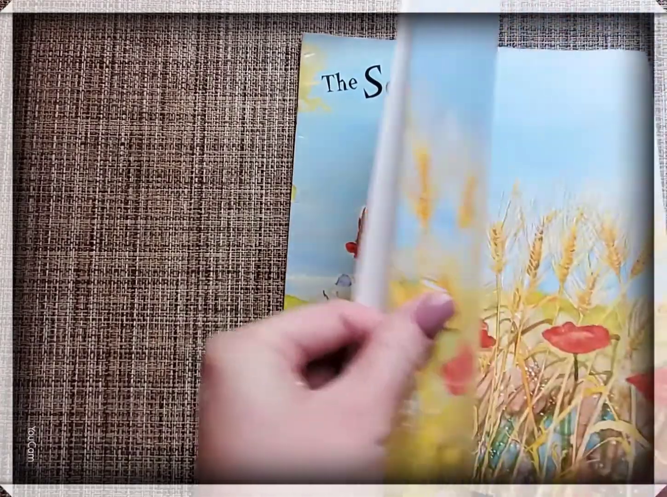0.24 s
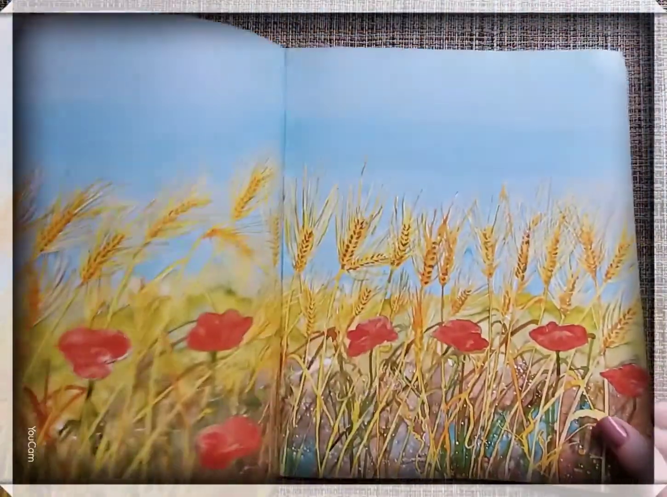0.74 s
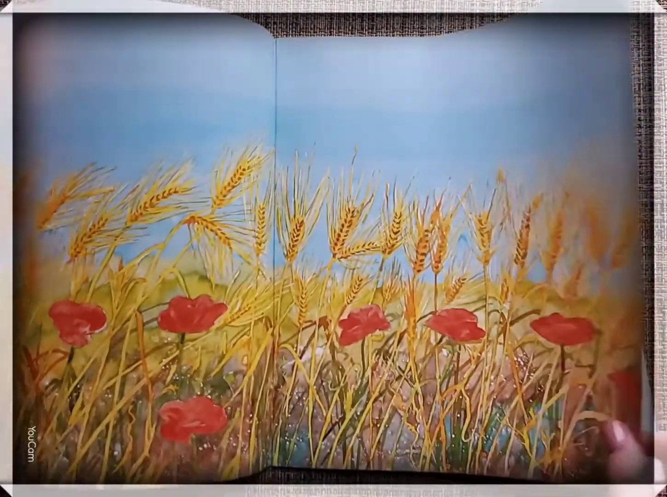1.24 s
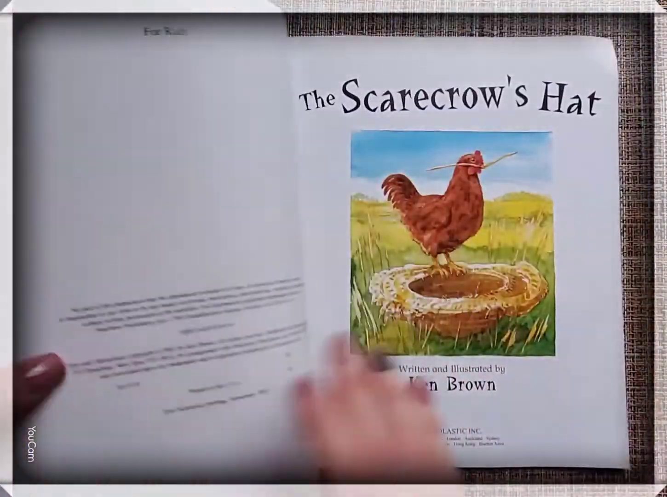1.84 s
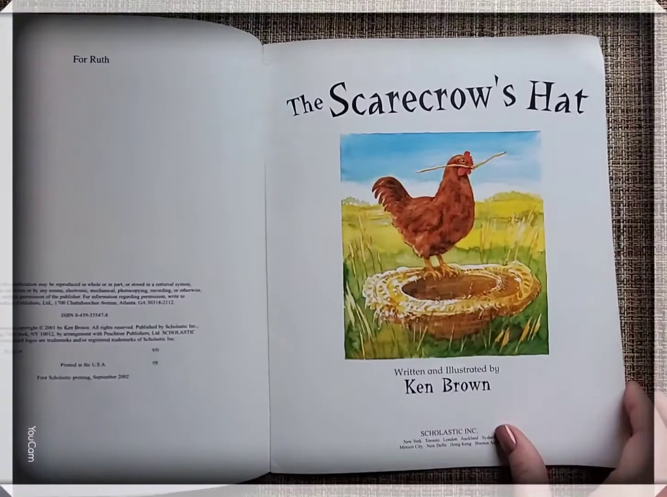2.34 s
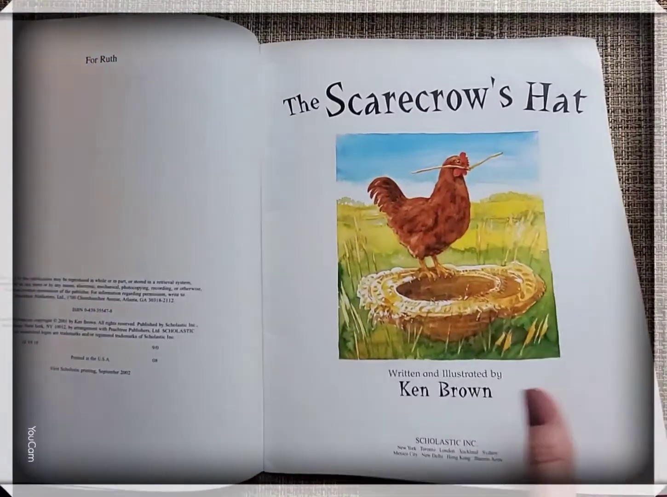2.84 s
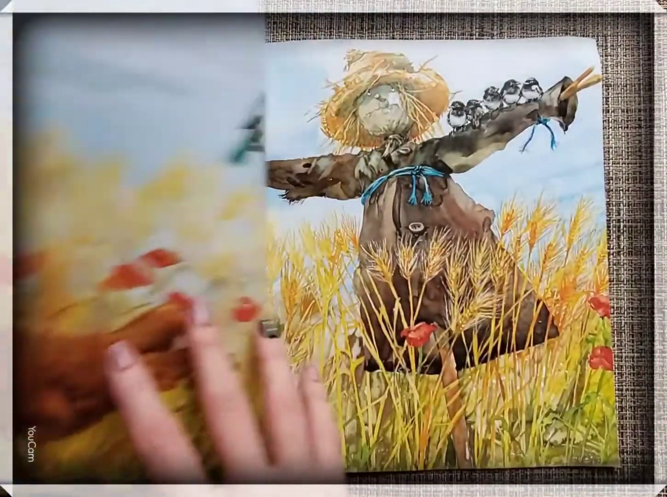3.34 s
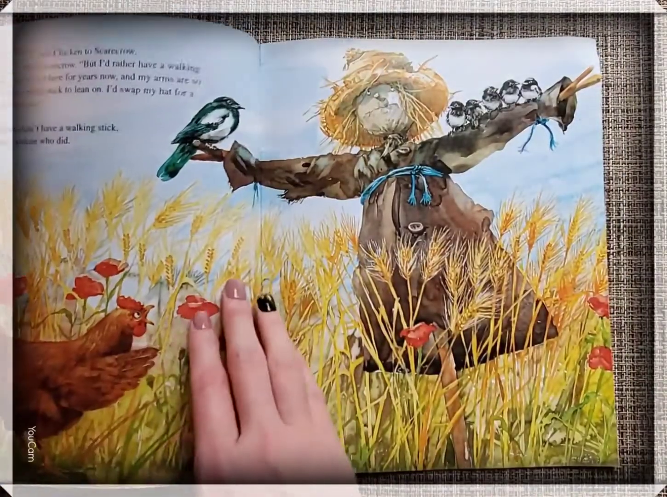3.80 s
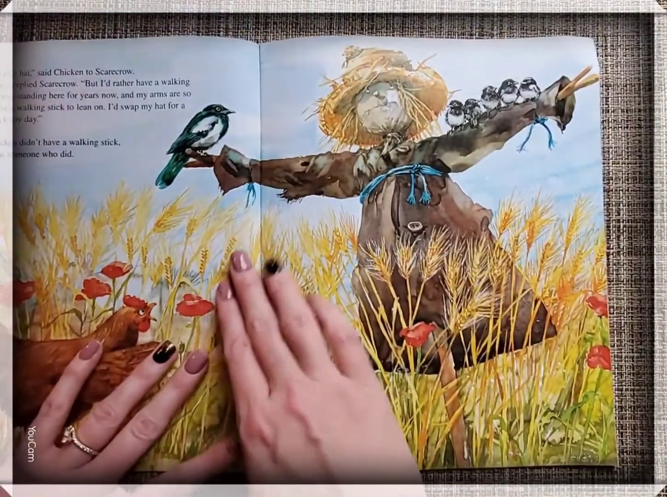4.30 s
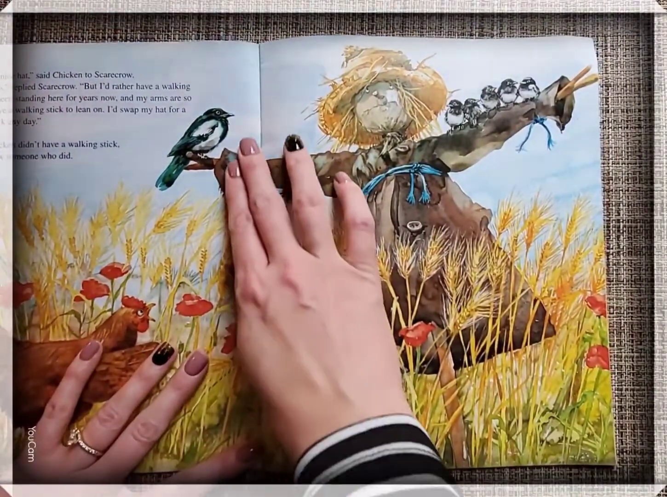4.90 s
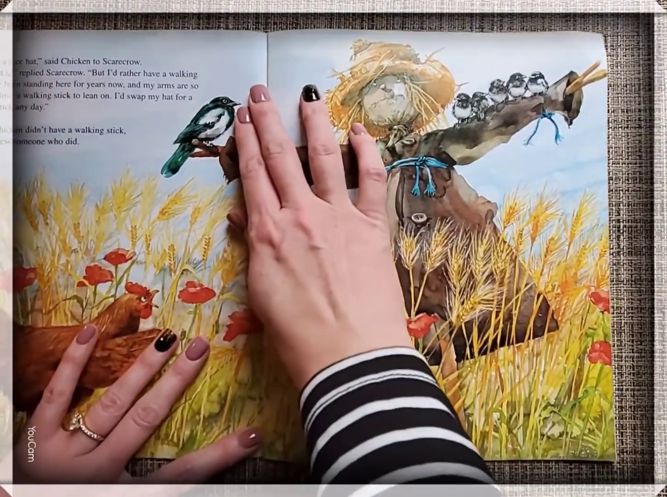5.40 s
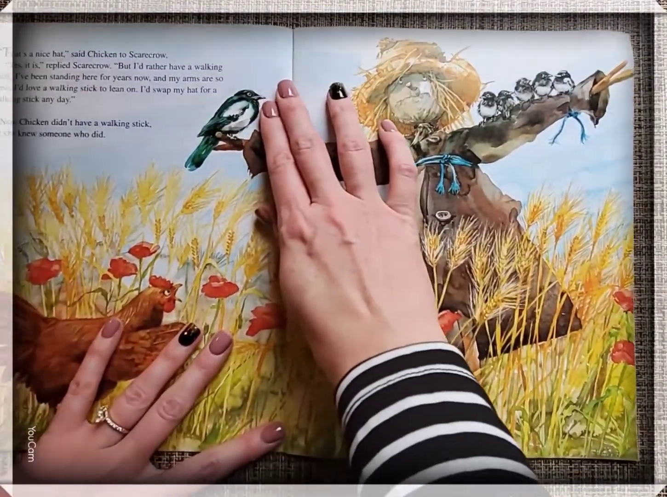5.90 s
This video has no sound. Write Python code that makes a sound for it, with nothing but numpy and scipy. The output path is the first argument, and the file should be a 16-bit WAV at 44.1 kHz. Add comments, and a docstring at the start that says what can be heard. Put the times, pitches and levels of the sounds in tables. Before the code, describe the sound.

Close paper handling in a small room: sliding sheets, small ticks, one sharp slap, a knock, dry skin friction and a low swelling hum.

```python
"""Pages of a paperback picture book are turned on a cloth mat in a small room, close to one microphone.
Sheets scrape off their neighbours as random fibre slips, buckle with ticks and flap down as filtered
clicks, once with a loud crack. Then a finger taps the open book, a decaying sine with one echo, and the
heel of the hand shuffles. Last, a palm rubs the fold flat, friction ringing the hollow under the hand,
while a low sine drone, faint from the start, swells underneath."""
import sys
import numpy as np
from scipy import signal
from scipy.fft import rfft, irfft, next_fast_len
from scipy.io import wavfile
from scipy.ndimage import uniform_filter1d, map_coordinates

SR = 44100
rng = np.random.default_rng(int(sys.argv[2]) if len(sys.argv) > 2 else 0)


def output_pcm(signal):
    """Save a mono or channel-first signal as 16-bit PCM at the path in sys.argv[1].

    Samples are clipped to [-1, 1] before scaling.
    """
    pcm = np.clip(np.atleast_2d(signal).T, -1, 1) * 32767
    wavfile.write(sys.argv[1], SR, np.round(pcm).astype(np.int16))


N = 271303
TIME = np.arange(N) / SR
STEPS = TIME[::32]      # a coarser clock for the hand's movements

# a sheet slides over its neighbour; swell over the stroke, surface hiss against the scraping edge,
# resonance of the air pocket under the sheet: start_s, length_s, level_db, swell_db, gloss_db, pocket_hz
SLIDE_STROKES = [(0.004, 0.094, -55, -0.5, -7.5, 2810), (0.141, 0.12, -58.5, -13, -11, 2120),
                 (0.278, 0.1, -62, -4, -5.5, 2880), (0.42, 0.058, -61, -5.5, -8, 3550),
                 (0.58, 0.12, -64, 0, -4.5, 3680), (0.741, 0.097, -59.5, -0.5, -3.5, 3520),
                 (0.849, 0.012, -58.5, 5, 4, 3520), (0.9, 0.06, -52.5, -4, -15, 2670),
                 (1.007, 0.069, -49.5, -4, -9, 3100), (1.097, 0.039, -47.5, -2.5, -12, 2490),
                 (1.14, 0.079, -54.5, 1, -8.5, 2210), (1.254, 0.02, -52, -1.5, -4.5, 2900),
                 (1.424, 0.14, -60.5, -9, -7, 3240), (1.614, 0.065, -64.5, 4, -6.5, 3900),
                 (1.71, 0.15, -54, -8, -9.5, 3040), (1.896, 0.034, -59, 1.5, -6, 3640),
                 (2.068, 0.2, -63, 1.5, -7.5, 4530), (2.366, 0.13, -67.5, 7, -8, 4320),
                 (2.738, 0.041, -65, -3, -5, 3570), (2.825, 0.14, -52.5, 3.5, -6.5, 2650),
                 (2.98, 0.082, -50.5, 10.5, -10.5, 3200), (3.188, 0.017, -61, -4.5, -2.5, 3350),
                 (3.4, 0.42, -68.5, -3, -2.5, 4850), (3.732, 0.05, -63.5, -5, 0.5, 4300),
                 (3.798, 0.13, -63, -7.5, -12, 4240), (3.993, 0.12, -74, 17, -10.5, 4900)]
PRESS_RISE_S, PRESS_FALL_S = 0.049, 0.15       # the hand bears down and lifts: time per 20 dB


def from_db(db):
    """Decibels to gain."""
    return 10 ** (np.asarray(db) / 20)


def rms_one(x):
    """Scale to unit rms."""
    return x / np.sqrt(np.mean(x ** 2) + 1e-20)


def evened(x):
    """Take the slow swings out of a narrow ring, so that the hand alone sets its level."""
    return x / np.sqrt(uniform_filter1d(x ** 2, SR // 50) + 1e-6)


def in_time(rows):
    """Each column of a curve, joined by straight lines, at every sample."""
    s, *columns = np.transpose(rows)
    return [np.interp(TIME, s, c) for c in columns]


def strokes(start_s, length_s, rise_s, fall_s):
    """Rise, hold and fall in dB, one row for each stroke; rise and fall are times per 20 dB."""
    early = np.maximum(start_s - STEPS, 0)
    late = np.maximum(STEPS - start_s - length_s, 0)
    return -20 * (early / max(rise_s, .002) + late / max(fall_s, .002))


def together(rows_db):
    """The gain of overlapping strokes, their powers added, at every sample."""
    power = np.sum(from_db(np.maximum(rows_db, -200)) ** 2, axis=0)
    return np.interp(TIME, STEPS, np.sqrt(power))


def low_pass(x, hz, order=2):
    """Take the treble off."""
    return signal.sosfilt(signal.butter(order, np.clip(hz, 20, .45 * SR), fs=SR, output="sos"), x)


def coloured(x, spectrum):
    """A causal filter with the given (Hz, dB) shape, falling steeply beyond its ends."""
    size = next_fast_len(len(x) + 4096)
    size += size % 2
    hz, db = np.transpose(spectrum)
    octave = np.log2(np.maximum(np.arange(size // 2 + 1) * SR / size, 1))
    beyond = np.abs(octave - np.clip(octave, np.log2(hz[0]), np.log2(hz[-1])))
    shape = np.interp(octave, np.log2(hz), db) - np.minimum(36 * beyond, 60)
    cepstrum = irfft(np.log(from_db(shape)))
    cepstrum[1:size // 2] *= 2      # minimum phase: nothing sounds before its cause
    cepstrum[size // 2 + 1:] = 0
    return irfft(rfft(x, size) * np.exp(rfft(cepstrum)))[:len(x)]


def swept(x, centre_hz, width_hz):
    """A resonance whose centre moves; rms 1."""
    turn = np.exp(2j * np.pi * np.cumsum(centre_hz) / SR)
    r = np.exp(-np.pi * width_hz / SR)
    at_zero_hz = signal.lfilter([1 - r], [1, -r], x / turn)
    return rms_one((at_zero_hz * turn).real)


def flutter(per_s):
    """A random wander of spread 1."""
    return rms_one(np.interp(TIME * per_s, np.arange(N), rng.standard_normal(N)))


def slips(per_s, spread_db):
    """Friction: fibres catch and let go at random, with sizes spread at random."""
    sizes = from_db(spread_db * np.minimum(rng.exponential(1, N), 5)) * rng.standard_normal(N)
    return sizes * (rng.random(N) < per_s / SR)


def friction(spectrum, per_s, spread_db):
    """Slips heard through the paper; rms 1."""
    return rms_one(coloured(slips(per_s, spread_db), spectrum))


def buckle(rattle_s, per_s, rattle_db):
    """One snap, then a rattle of smaller ones that dies by 60 dB in the rattle time."""
    t = TIME[:SR // 4]
    clicks = rng.standard_normal(len(t)) * (rng.random(len(t)) < per_s / SR)
    clicks *= from_db(rattle_db - 60 * t / max(rattle_s, .002))
    clicks[0] = rng.choice([-1, 1])
    return clicks


def add(out, s, level_db, sound):
    """Mix a blow in at its time; its height is set by the power of its first 5 ms."""
    at = max(round(s * SR), 0)
    sound = sound[:N - at]
    height = 2 * np.sqrt(np.mean(sound[:SR // 200] ** 2))
    out[at:at + len(sound)] += from_db(level_db) * sound / height


def patchy(x):
    """The level wanders at random in each band, about twenty times a second, least in the treble."""
    # spread of the wander by pitch: pitch_hz, spread_db
    spread = [(1500, 3.0), (6000, 2.8), (10000, 1.7)]
    hz, s, cells = signal.stft(x, SR, nperseg=512)
    band, step = np.sqrt(hz) / 1.8, s * 20      # bands widen with pitch
    wander = rng.standard_normal((int(band[-1]) + 2, int(step[-1]) + 2))
    depth_db = np.interp(hz, *np.transpose(spread))[:, None]
    grid = np.meshgrid(band, step, indexing="ij")
    gain = from_db(depth_db * map_coordinates(wander, grid, order=1))
    return signal.istft(cells * rms_one(gain), SR)[1][:N]


def page_motion():
    """How strongly the page billows, bends, scrapes and hisses, from its slides and swings."""
    # the page swings through the air or is pushed down; bending is against billowing:
    # start_s, length_s, billow_db, bend_db
    swings = [(0.048, 0.23, -59, -0.5), (0.452, 0.24, -65, -15), (0.65, 0.28, -62.5, -2.5),
              (0.85, 0.009, -53, 2), (0.974, 0.037, -55.5, -18), (1.403, 0.073, -56.5, 3),
              (1.705, 0.043, -44.5, 4.5), (1.755, 0.019, -40, 0), (1.884, 0.043, -59, 4.5),
              (2.187, 0.064, -77.5, 18), (2.824, 0.23, -72, 18), (3.199, 0.012, -53, 0),
              (3.309, 0.03, -56, -6), (3.381, 0.016, -48.5, 2.5), (3.491, 0.031, -53.5, 0)]
    slide_rise_s, slide_fall_s = 0.061, 0.029       # time per 20 dB
    swing_rise_s, swing_fall_s = 0.0091, 0.083      # time per 20 dB
    creep_mean_db, creep_follows, creep_fall_s = -69, 0.16, 0.22
    gentle_db = -62.5       # the level of a gentle slide
    bend_follows = 0.89     # share of a slide's extra dB that goes into flexing

    start, length, level_db, swell_db, gloss_db, _ = np.transpose(SLIDE_STROKES)[:, :, None]
    swelling_db = swell_db * (np.clip((STEPS - start) / length, 0, 1) - .5)
    stroke_db = level_db + swelling_db + strokes(start, length, slide_rise_s, slide_fall_s)
    # after a stroke the sheet creeps on quietly, a little louder after a hard one
    creep_db = creep_mean_db + creep_follows * (level_db - level_db.mean())
    creep_db = creep_db + strokes(start, length, slide_rise_s, creep_fall_s)
    slide_db = np.maximum(stroke_db, creep_db)
    scrape, hiss = together(slide_db), together(slide_db + gloss_db)

    start, length, level_db, stiff_db = np.transpose(swings)[:, :, None]
    swing_db = level_db + strokes(start, length, swing_rise_s, swing_fall_s)
    # a sliding sheet also billows and flexes a little
    billow = np.hypot(together(swing_db), from_db(-11.5) * scrape)
    flex = from_db(-3.5 + gentle_db) * (scrape / from_db(gentle_db)) ** bend_follows
    bend = np.hypot(together(swing_db + stiff_db), flex)
    return billow, bend, scrape, hiss


def sheet(billowing, bending, scraping, hissing):
    """A sliding sheet: the whole page billows and bends, its edge scrapes, its coating hisses."""
    # colours of the four parts: pitch_hz, level_db per Hz
    billow_colour = [(170, -14), (230, -5.5), (310, -3.5), (480, -1), (620, -4.5)]
    bend_colour = [(560, -4), (760, 3.5), (950, 2), (1200, -1), (1700, -5.5)]
    scrape_colour = [(1250, -4), (1800, 0.5), (2300, 0), (3300, 0.5), (4000, -2), (5200, -4.5)]
    hiss_colour = [(5000, -4), (5800, -5), (7400, -3), (8400, -8.5), (9700, -6.5), (10900, -11),
                   (12400, -7), (14000, -11.5)]
    grip = flutter(per_s=110)       # the grip tightens and loosens for all of the page at once
    billow = billowing * from_db(-5.5 + 1.8 * grip) * friction(billow_colour, per_s=2000, spread_db=-1.0)
    bend = bending * from_db(-4.0 + 0.62 * grip) * friction(bend_colour, per_s=3500, spread_db=1.5)
    edge = friction(scrape_colour, per_s=6000, spread_db=1.0)
    pocket_hz, = in_time([(s + length / 2, hz) for s, length, *_, hz in SLIDE_STROKES])
    pocket = swept(edge, pocket_hz, width_hz=2300)
    scrape = scraping * from_db(-2.0 + 1.53 * grip) * rms_one(pocket + 0.091 * edge)
    hiss = hissing * from_db(2.5 + 0.42 * grip) * friction(hiss_colour, per_s=16000, spread_db=-1.0)
    return patchy(billow + bend + scrape + hiss)


def flaps(tilt_db=8, taut_hz=2500):
    """The sheet slaps the stack piece by piece; a slack landing is duller than a taut one."""
    # the sheet flaps or lands, levels before a common trim, brightness at half the treble cutoff:
    # start_s, level_db, brightness_hz, rattle_s
    landings = [(0.143, -34.5, 620, 0.008), (0.149, -38.5, 4600, 0.097), (0.159, -36, 3600, 0.025),
                (1.4067, -30, 2520, 0.084), (1.475, -36.5, 1560, 0.16), (1.701, -29, 6950, 0.033),
                (1.748, -23.5, 1760, 0.16), (1.758, -17, 3470, 0.055), (1.762, -18.5, 3220, 0.019),
                (1.766, -20, 2180, 0.035), (1.769, -18.5, 1910, 0.055), (1.78, -23, 2210, 0.087),
                (1.806, -33.5, 1920, 0.1), (3.373, -41, 1400, 0.24), (3.406, -33, 1200, 0.078),
                (3.422, -36, 1180, 0.06), (3.563, -32.5, 1750, 0.061), (3.576, -35, 1410, 0.054)]
    # colour of a taut slap before its tilt: pitch_hz, level_db
    slap_colour = [(45, 7), (130.0, -5), (210.0, -6.5), (300, -6), (400, -1.5), (590.0, -2.5),
                   (710.0, -0.5), (860.0, -3.5), (1130.0, 2), (1450.0, -2.5), (2300.0, -8), (2950.0, -8),
                   (4400.0, -21), (7500.0, -39), (12000.0, -49.5)]
    out = np.zeros(N)
    for s, level_db, hz, rattle_s in landings:
        slope_db = tilt_db * np.log2(hz / taut_hz)      # per octave above 1 kHz
        colour = [(f, db + slope_db * np.log2(max(f / 1000, 1))) for f, db in slap_colour]
        slap = coloured(buckle(rattle_s, per_s=5000, rattle_db=-6.0), colour)
        add(out, s, level_db - 6.0, low_pass(slap, 2.0 * hz))
    return out


def ticks(rattle_s=0.06):
    """Small buckles ring in the stiff page edge, each at its own pitch; a nail is brighter than paper."""
    # the paper buckles or a nail catches its edge, levels before a common trim:
    # start_s, level_db, tilt_db per octave
    buckles = [(0.034, -42.5, -4), (0.069, -43, 11), (0.562, -49.5, 1.5), (0.877, -42, -6),
               (1.251, -37.5, -3.5), (1.338, -38.5, -1), (1.348, -37.5, 0), (1.354, -36.5, -3),
               (1.36, -33, 1.5), (2.047, -49.5, -1.5), (2.196, -41, -0.5), (2.354, -41.5, -2.5),
               (2.398, -42.5, 2.5), (2.432, -37, -4.5), (2.504, -43.5, -2.5), (2.795, -38, 3.5),
               (2.823, -45.5, -3.5), (3.072, -39.5, 9), (3.557, -40, -1.5), (3.85, -47.5, 8),
               (4.211, -56, 8), (4.292, -49, 3), (5.2, -50.5, 3.5)]
    # colour of a tick before its shift and tilt: pitch_hz, level_db
    tick_colour = [(330, -23.5), (580, -9.5), (800, 0), (1150, -5), (1800, -12.5), (2500, -6), (3300, -15),
                   (4700, -7), (7000, -22), (12000, -34)]
    out = np.zeros(N)
    for s, level_db, tilt_db in buckles:
        stiffness = 2 ** rng.uniform(-.15, .15)
        colour = [(f * stiffness, db + tilt_db * np.log2(f / 1000)) for f, db in tick_colour]
        add(out, s, level_db - 7.0, coloured(buckle(rattle_s, per_s=4500, rattle_db=-7.5), colour))
    return out


def book_body(x, ring_db):
    """A blow sets the pages and the cover ringing briefly."""
    # the book on its mat rings under every flap and tick: pitch_hz, level_db before ring_db
    modes = [(422, -3), (532, -6.5), (718, 0), (1113, -9.5), (1485, 0), (1855, -2.5)]
    t60_s = 0.029
    r = from_db(-60 / (t60_s * SR))
    rings = np.zeros(len(x))
    for hz, db in modes:
        poles = [1, -2 * r * np.cos(2 * np.pi * hz / SR), r * r]
        rings += from_db(db) * signal.lfilter([1 - r, 0, r - 1], poles, x)
    return x + from_db(ring_db) * rings


def judders(width_share=0.096):
    """A quick run of slips in the bowed sheet rings one short resonance."""
    # the bowed sheet judders and rings for a moment: start_s, length_s, level_db, pitch_hz
    rings = [(0.876, 0.011, -50.5, 974), (1.096, 0.0037, -49, 1020), (1.13, 0.036, -54, 1800),
             (1.236, 0.031, -51, 1110), (2.897, 0.084, -55, 5000), (2.968, 0.085, -53.5, 3080),
             (3.748, 0.05, -63, 7340), (5.202, 0.01, -62.5, 1600)]
    rise_s, fall_s = 0.012, 0.012      # time per 20 dB
    out, catches, size = np.zeros(N), slips(per_s=6000, spread_db=2.0), SR // 4
    for start, length, level_db, hz in rings:
        at = round(start * SR) - SR // 20       # leave room for the rise
        span = slice(at, at + size)
        skirts = signal.butter(1, [hz / 2, min(2 * hz, SR / 3)], "band", fs=SR, output="sos")
        near_pitch = signal.sosfilt(skirts, catches[span])
        ring = evened(swept(near_pitch, np.full(size, hz), width_share * hz))
        out[span] += together([level_db + strokes(start, length, rise_s, fall_s)])[span] * ring
    return out


def taps(book_hz=880, ring_s=0.015, soft_hz=1500, echo_s=0.017, echo_db=-15):
    """A soft fingertip rings the book for a few cycles; a nearby wall answers."""
    # a fingertip taps the book, levels before a small trim: start_s, level_db
    touches = [(3.952, -28.5), (4.193, -51.5)]
    out, t = np.zeros(N), TIME[:SR // 10]
    knock = low_pass(np.sin(2 * np.pi * book_hz * t) * from_db(-60 * t / ring_s), soft_hz)
    knock = coloured(knock, [(250, -19.0), (650, -3.0), (2300, -1.5)])
    for s, level_db in touches:
        add(out, s, level_db + .5, knock)
        add(out, s + echo_s, level_db + echo_db, knock)
    return out


def heel():
    """The heel of the hand sticks and slips on the page, with a low, grainy, hollow sound."""
    # the heel of the hand shuffles on the page: start_s, length_s, level_db
    shuffles = [(3.914, 0.24, -63.5), (4.207, 0.15, -64.5)]
    # its colour: pitch_hz, level_db per Hz
    heel_colour = [(270, -3.5), (300, 1.5), (390, -4), (500, 0.5), (720, -5.5)]
    start, length, level_db = np.transpose(shuffles)[:, :, None]
    grain = friction(heel_colour, per_s=500, spread_db=1.5)
    return together(level_db + strokes(start, length, PRESS_RISE_S, PRESS_FALL_S)) * grain


def palm(hiss_db=0.5):
    """Skin drags over glossy paper, ringing the hollow under the hand; it rasps when pressed and hisses."""
    # how fast the palm slides along the fold, as the level of its hiss before hiss_db: start_s, level_db
    pace = [(4.33, -60.5), (4.47, -63), (4.532, -67.5), (4.838, -67), (4.988, -72), (5.116, -68.5),
            (5.298, -67.5), (5.42, -79), (5.558, -67.5), (5.618, -72), (5.765, -76), (5.85, -59.5),
            (5.938, -59.5), (5.98, -75), (6.02, -87)]
    # the hand bears down harder, with fingertip drag, skin rub and dry rasp, before their trims:
    # start_s, length_s, drag_db, rub_db, rasp_db
    presses = [(3.95, 0.2, -78, -68, -87), (4.211, 0.095, -56, -60, -81), (4.727, 0.015, -68, -56, -56),
               (4.808, 0.026, -47, -64, -59.5), (4.89, 0.016, -58, -83, -69),
               (5.818, 0.065, -83, -56.5, -62.5)]
    # the hollow between hand and page, before its flutter: start_s, resonance_hz
    hollow_path = [(4.185, 2020), (4.195, 1080), (4.3, 1400), (4.53, 1400), (4.68, 1570), (4.74, 1810),
                   (4.81, 1480), (4.95, 2400), (5.16, 2660), (5.21, 1670), (5.88, 1525)]
    # colours of drag, rub, rasp and hiss: pitch_hz, level_db per Hz
    drag_colour = [(300, -17), (520, -11), (740, -15), (950, -7), (1250, -13.5)]
    rub_colour = [(1100, -0.5), (1500, 0), (2000, 3), (2500, -7)]
    rasp_colour = [(1200, -0.5), (1900, 7), (2700, -6), (3600, -4), (5000, -36)]
    hiss_colour = [(2100, -5.5), (3000, -3), (4800, -4.5), (7200, -4.5), (10900, -9.5), (12400, -6),
                   (14000, -11.5)]
    down_s, landing_s = 4.298, 0.13     # the palm is fully down; time per 20 dB before that
    light_drag_db, light_rub_db = -1.5, 0.5     # against the hiss, under a light hand
    light_squeak_hz, squeak_rise_hz = 905, 95   # light fingertips; rise under the hardest press
    duller_from_s = 5.1     # near the top of the page the hiss is duller

    pace_db, = in_time(pace)
    landing_db = -20 * np.maximum(down_s - TIME, 0) / landing_s
    sliding = from_db(pace_db + hiss_db + landing_db)
    start, length, drag_db, rub_db, rasp_db = np.transpose(presses)[:, :, None]
    press_db = strokes(start, length, PRESS_RISE_S, PRESS_FALL_S)
    dragging = np.hypot(together(press_db + drag_db), from_db(light_drag_db) * sliding)
    rubbing = np.hypot(together(press_db + rub_db), from_db(light_rub_db) * sliding)

    tips = friction(drag_colour, per_s=4000, spread_db=2.0)
    squeak_hz = light_squeak_hz + squeak_rise_hz * dragging / dragging.max()
    wavering_hz = squeak_hz * (1 + 0.029 * flutter(per_s=9.2))
    squeak = swept(tips, wavering_hz, width_hz=150)      # fingertips almost squeak
    drag = dragging * from_db(-7.5) * evened(squeak + 0.55 * tips)

    skin = friction(rub_colour, per_s=1400, spread_db=1.5)
    hollow_hz = in_time(hollow_path)[0] * (1 + .035 * flutter(per_s=45))
    hollow = swept(skin, hollow_hz, width_hz=170)
    rub = rubbing * from_db(-5.0) * evened(hollow + 0.28 * skin) * from_db(1.5 * flutter(per_s=70))

    rasping = together(press_db + rasp_db) * from_db(-5 + 2.5 * flutter(per_s=420))
    rasp = rasping * friction(rasp_colour, per_s=4200, spread_db=-0.5)
    grain = friction(hiss_colour, per_s=18000, spread_db=0.0)
    hiss = sliding * np.where(TIME > duller_from_s, low_pass(grain, 7500, order=1), grain)
    return drag + rub + patchy(rasp + hiss)


def room(x, wet_db, wall_hz, t60_s=0.27):
    """Dense, slightly dull reflections that begin a few milliseconds late."""
    t = TIME[:SR // 2]
    tail = rng.standard_normal(len(t)) * (t > .005) * from_db(-60 * t / t60_s)
    tail = low_pass(tail, wall_hz, order=1)
    return x + from_db(wet_db) * signal.fftconvolve(x, tail / np.sqrt(np.sum(tail ** 2)))[:N]


def handling_rumble(billowing):
    """The moving page pushes air and the book rocks on its mat, each as low filtered noise."""
    # the book rocks on its mat: start_s, length_s, level_db
    bumps = [(0.092, 0.071, -53.5), (1.393, 0.09, -56.5), (1.767, 0.018, -44), (2.492, 0.016, -63)]
    billow_db = 20 * np.log10(billowing + from_db(-88))
    push = rms_one(coloured(rng.standard_normal(N), [(25, -10.0), (60, 1.0), (190, -9.0)]))
    start, length, level_db = np.transpose(bumps)[:, :, None]
    rocking = together(level_db + strokes(start, length, rise_s=0.033, fall_s=0.074))
    thud = rms_one(coloured(rng.standard_normal(N), [(60, 10.0), (140, 1.5), (300, -3.0)]))
    return from_db(-67 + 0.86 * (billow_db + 62.5)) * push + rocking * thud


def drone():
    """A low tone, wavering while it is faint and steady once it swells, with some rumble around it."""
    # level of the drone, further lowered while faint: start_s, level_db
    swell = [(0, -60), (2, -62.5), (4.95, -63), (5.27, -58.5), (5.42, -53), (5.7, -47.5), (5.88, -42),
             (5.99, -56), (6.06, -50.5), (6.12, -62)]
    # pitch before the wavering: start_s, pitch_hz
    pitch = [(4.5, 48.6), (5.35, 46.1), (5.72, 49.5), (5.92, 52.2)]
    # colour of the rumble around the tone: pitch_hz, level_db per Hz
    skirt = [(25, -12), (65, -3), (130, -7), (200, -17.5), (320, -24)]
    (level_db,), (hz,) = in_time(swell), in_time(pitch)
    faint = np.clip((-55.5 - level_db) / 10, 0, 1)
    wavering_hz = hz + 4 * faint * flutter(per_s=6.8)
    tone = np.sqrt(2) * np.sin(2 * np.pi * np.cumsum(wavering_hz) / SR)
    rumble = rms_one(coloured(rng.standard_normal(N), skirt))
    faint_db = faint * (1.8 * flutter(per_s=7.0) - 7.0)
    return from_db(level_db + faint_db) * (tone + from_db(-18.5) * rumble)


def background(level_db=-69.5):
    """The quiet, steady background: filtered noise."""
    # its colour: pitch_hz, level_db against the other pitches
    floor_colour = [(30, 5.5), (70, 4), (450, -25.5), (1500, -26), (2600, -41.5), (4600, -29.5),
                    (14000, -40.5)]
    return from_db(level_db) * rms_one(coloured(rng.standard_normal(N), floor_colour))


def scene():
    """Paper and hands in the room over its quiet background, the same in both channels."""
    billowing, bending, scraping, hissing = page_motion()
    paper = sheet(billowing, bending, scraping, hissing) + judders()
    blows = book_body(flaps() + ticks(), ring_db=0.5)
    hand = taps() + heel() + palm()
    near = room(paper + blows + hand, wet_db=-15, wall_hz=4150)
    mono = near + handling_rumble(billowing) + drone() + background()
    return np.array([mono, mono])


def record(dry):
    """The top is cut steeply above 14 kHz."""
    return signal.sosfilt(signal.ellip(12, .1, 70, 14000, fs=SR, output="sos"), dry)


dry = scene()
out = record(dry)
output_pcm(out)
```